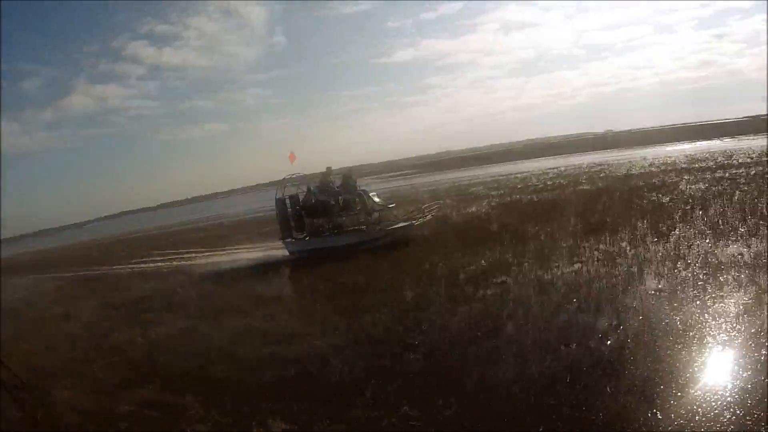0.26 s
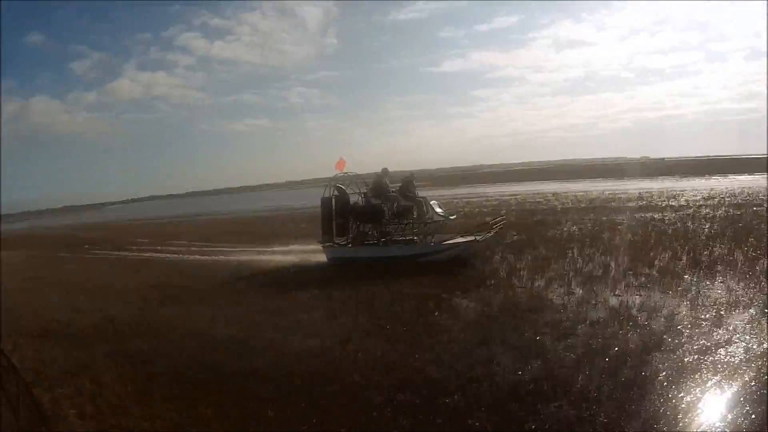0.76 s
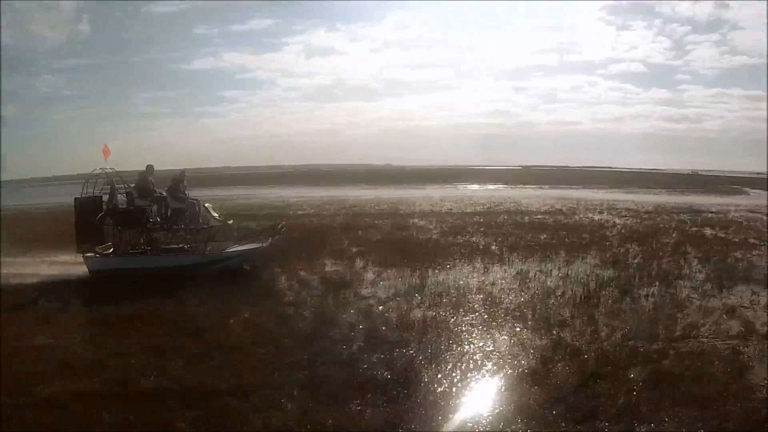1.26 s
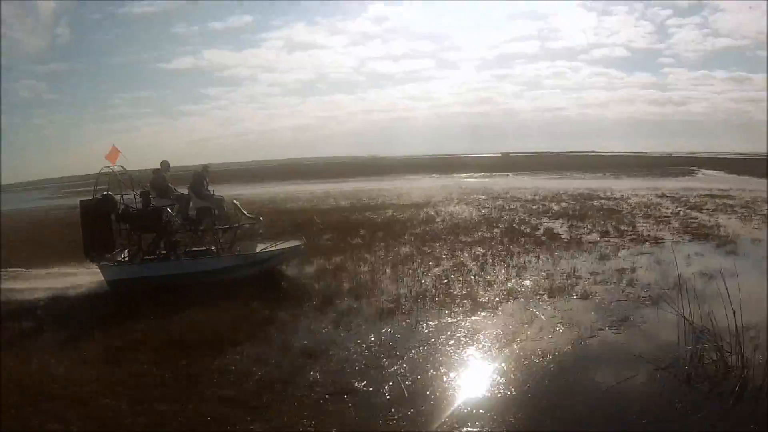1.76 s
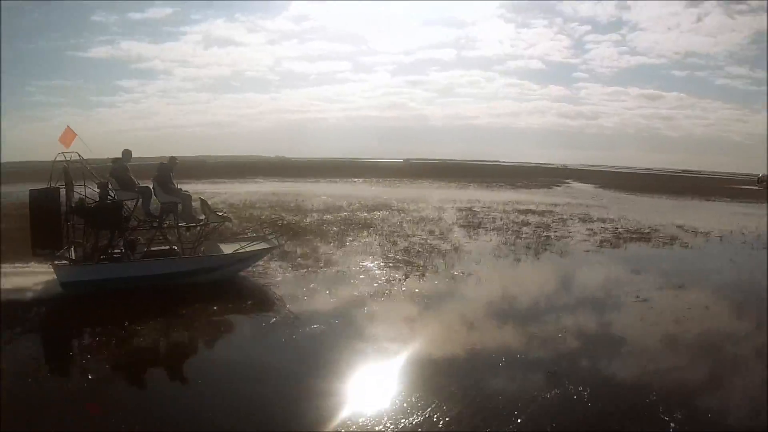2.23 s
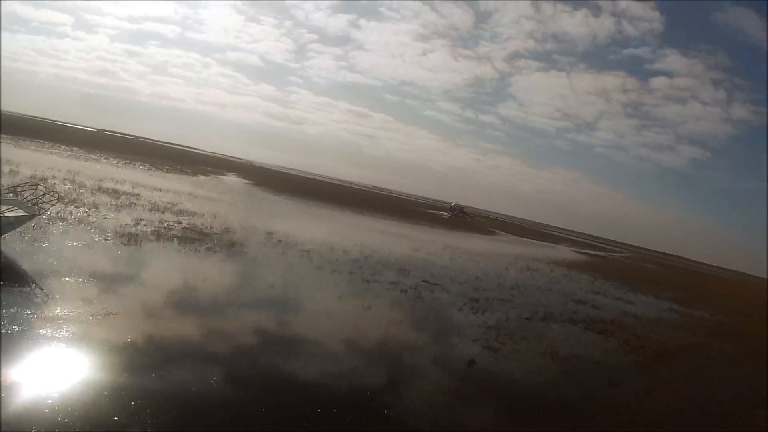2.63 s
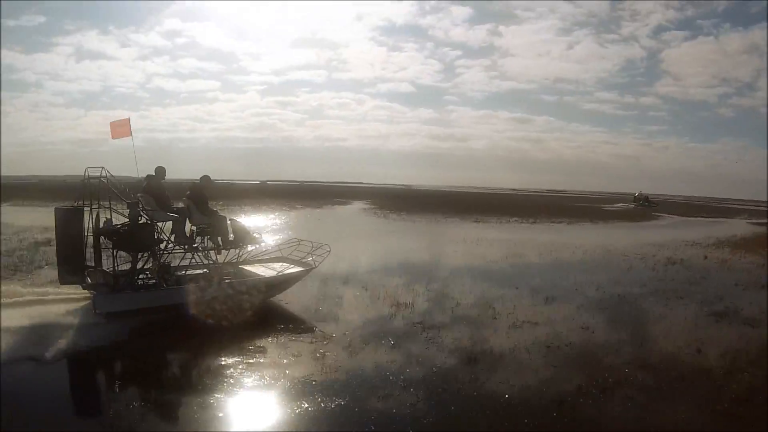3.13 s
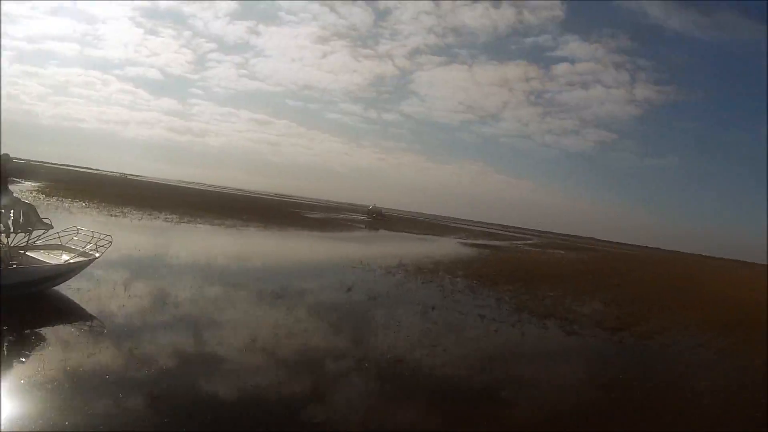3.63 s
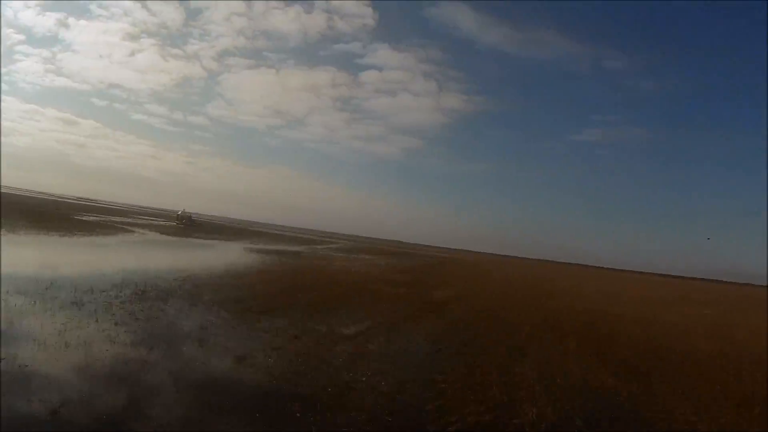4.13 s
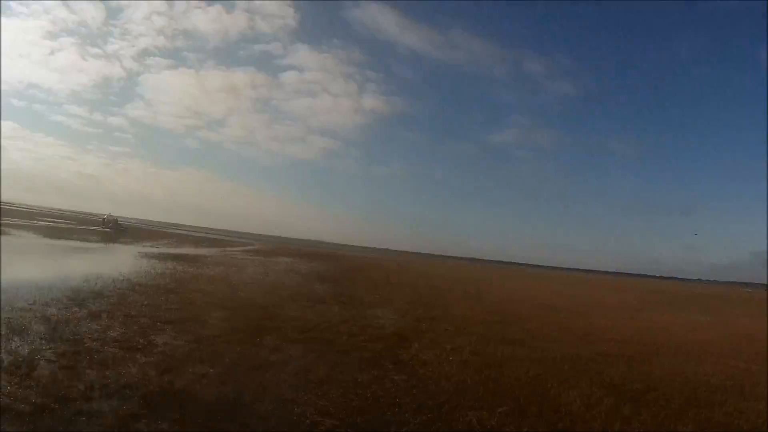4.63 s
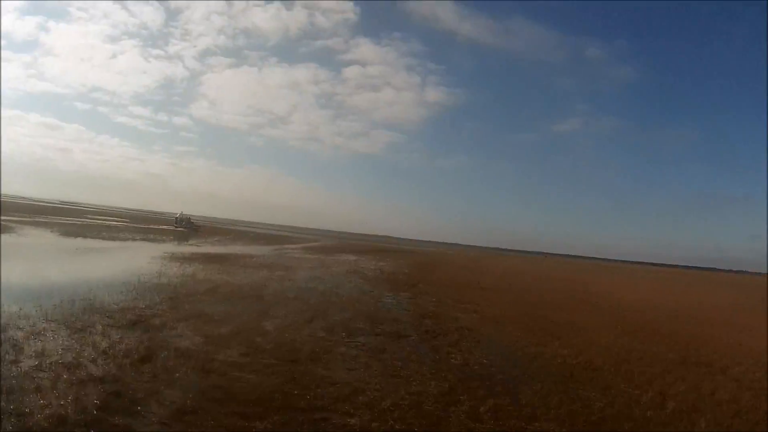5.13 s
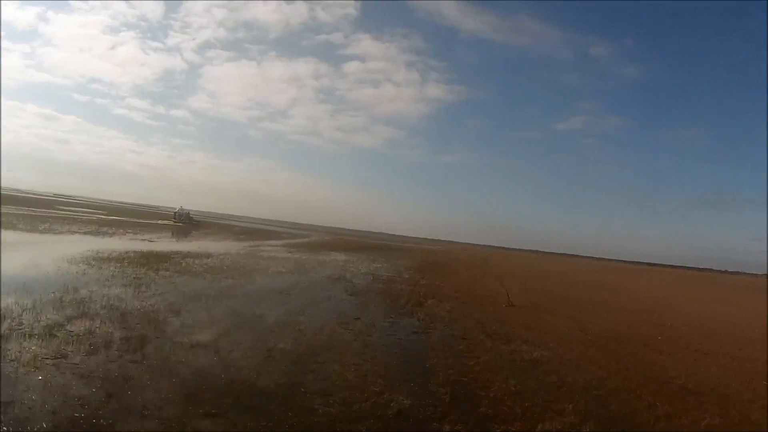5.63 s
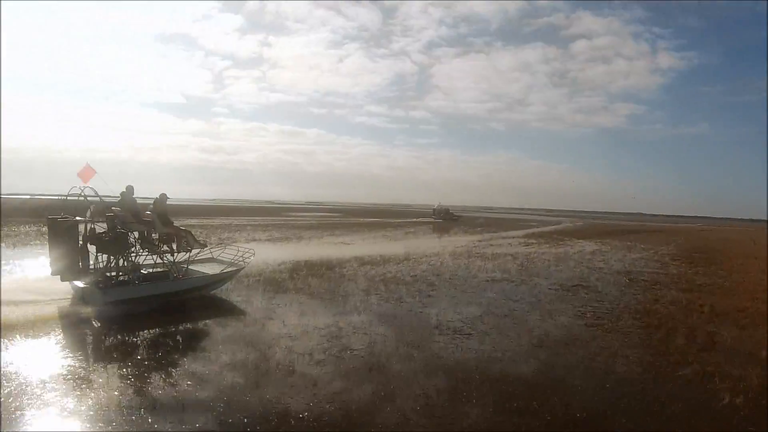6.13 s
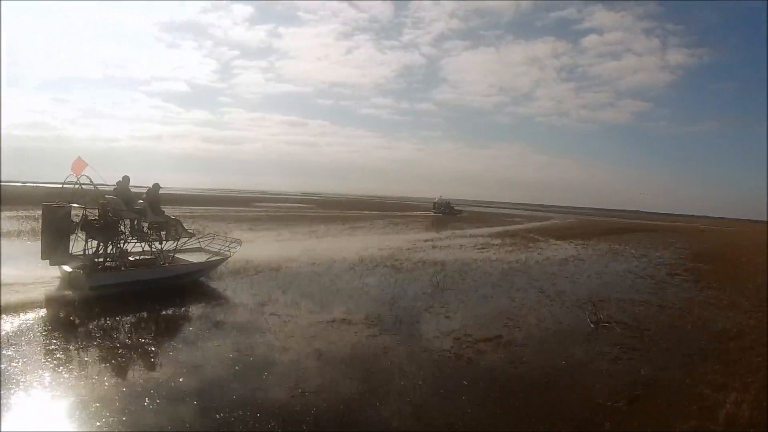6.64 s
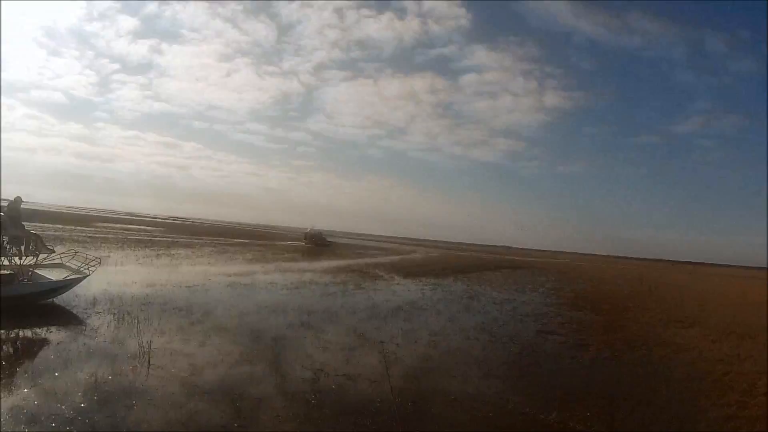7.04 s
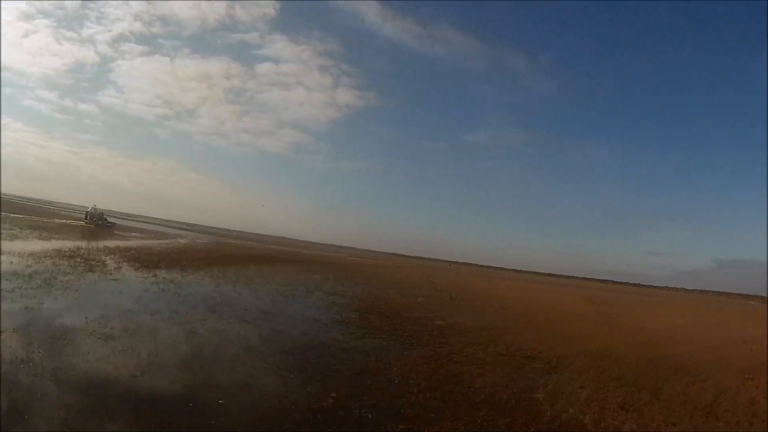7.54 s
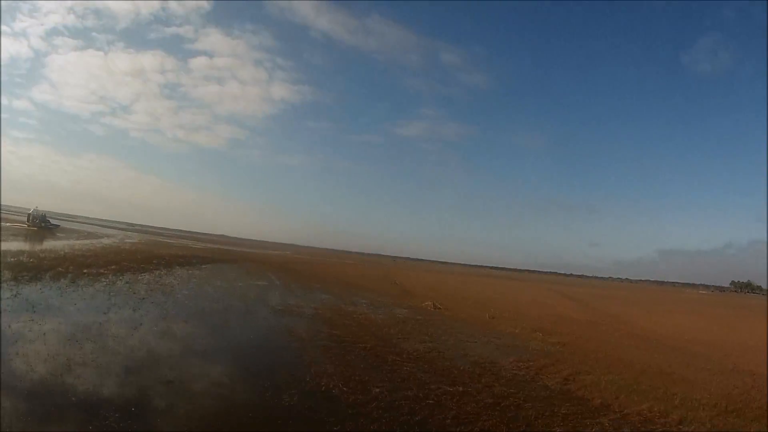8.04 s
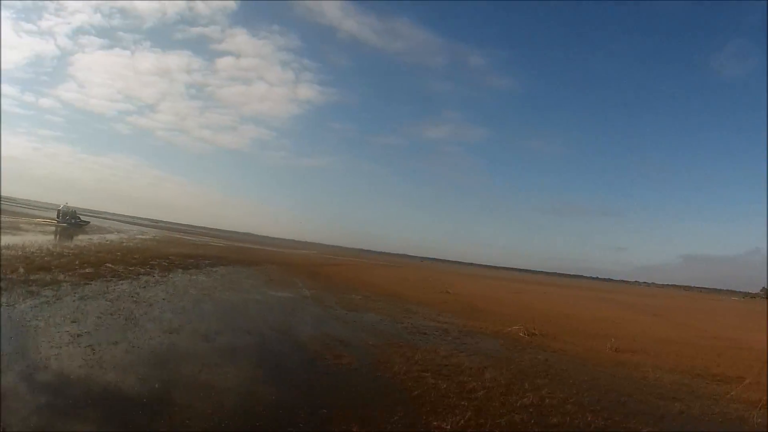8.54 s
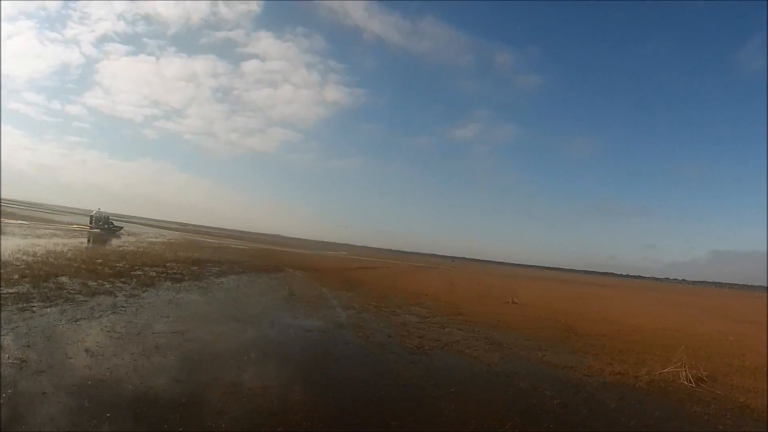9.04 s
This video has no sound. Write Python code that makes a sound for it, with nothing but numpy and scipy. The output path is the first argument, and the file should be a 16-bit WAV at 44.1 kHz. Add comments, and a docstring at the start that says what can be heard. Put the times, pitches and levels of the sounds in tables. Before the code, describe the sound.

Aboard a speeding airboat on open marsh, a geared engine and three-blade propeller drone loudly amid rushing air and hissing spray. A second boat close by guns its throttle, its hard, rapid blade slap dominating until nearly three seconds, then dropping away. The drone gradually lowers, with swells of wash around three and six to seven seconds. Late on, the blades sing with a fluttering high tone. The onboard microphone is windy, close and level-compressed.

```python
"""A driving drone slowly eases off as an airboat, a geared engine with a three-blade propeller, crosses a marsh.
Beside it a second airboat guns its throttle with a hard blade slap; its wash swells when the microphone turns to it.
Tones locked to the firings and blade passes make both voices; the tips whistle and, late on, sing once a turn.
Coloured noise makes the wind, wash and spray; gain control and rounded peaks shape the mix."""
import sys
import numpy as np
from scipy import signal
from scipy.fft import rfft, irfft, next_fast_len
from scipy.io import wavfile

SR = 44100
rng = np.random.default_rng(int(sys.argv[2]) if len(sys.argv) > 2 else 0)


def pcm_store(signal):
    """Save signal as 16-bit PCM."""
    levels = np.round(np.clip(np.atleast_2d(signal), -1, 1) * 32767)
    wavfile.write(sys.argv[1], SR, levels.astype(np.int16).T)


N = 409688

# colours of the air torn by the blades, dull and harsh: [f/Hz, density/dB]
ROAR_COLOUR = [(250, -12.5), (450, 0), (560, -1.5), (750, 0.5), (1020, -0.5), (1200, -19), (1500, -20),
               (3000, -51.5)]
RASP_COLOUR = [(700, -30.5), (1100, 2), (1350, 0), (1550, -3), (1750, -2), (2000, -15.5), (3000, -34),
               (6000, -48)]
# colours of the wash and of the fine spray: [f/Hz, density/dB]
WASH_COLOUR = [(1200, -0.5), (2000, -5.5), (2700, 3), (3300, -0.5), (3900, -8.5), (6000, -18.5),
               (12000, -35.5)]
SPRAY_COLOUR = [(2500, -3), (3700, 0), (4300, 2), (5000, 0.5), (5500, 2.5), (6200, -11.5), (7300, -9),
                (8000, -16), (8700, -14), (9700, -24), (11300, -18.5), (13000, -29), (15000, -32.5)]
# echoes between hull, cage and water favour some pitches and cancel others: [f/Hz, gain/dB]
HULL_ECHO_COLOUR = [(80, 0.5), (110, 2), (143, -9.5), (166, 3.5), (190, 1.5), (218, 5), (255, -5.5),
                    (287, -12.5), (322, 5), (365, 1), (420, 2.5), (460, -1.5), (510, 4), (555, -4),
                    (620, -1.5)]


def from_db(db):
    """Decibels to gain."""
    return np.exp(np.asarray(db) * (np.log(10) / 20))


def rms_one(x):
    """Scale to unit rms."""
    return x / np.sqrt(np.mean(x ** 2) + 1e-20)


def in_time(rows):
    """Each column of a curve, sample by sample."""
    seconds, *columns = np.transpose(rows)
    return [np.interp(np.arange(N) / SR, seconds, column) for column in columns]


def on_log_axis(points, where):
    """Read levels between points on a logarithmic axis of frequency or tone number."""
    x, db = np.transpose(points)
    return np.interp(np.log(where + 1e-9), np.log(x), db)


def drift(rate_hz):
    """Slow random motion with spread 1: noise through two equal low-pass poles."""
    step = 40  # samples between the points of the slow curve
    pole = np.exp(-2 * np.pi * rate_hz * step / SR)
    raw = rng.standard_normal(N // step + 2002)
    slow = signal.lfilter([1], [1, -2 * pole, pole * pole], raw)[2000:]  # skip the settling
    return np.interp(np.arange(N) / step, np.arange(len(slow)), rms_one(slow))


def noise(spectrum):
    """Turbulence with the given colour, falling away above the last point; rms 1."""
    size = next_fast_len(N)
    hz = np.arange(size // 2 + 1) * SR / size
    gain = from_db(on_log_axis(spectrum, hz)) / np.maximum(hz / spectrum[-1][0], 1) ** 2
    white = rfft(rng.standard_normal(size))
    return rms_one(irfft(white * gain, size)[:N])


def colour(x, spectrum):
    """Filter by a spectrum."""
    size = next_fast_len(N + SR // 4)
    hz = np.arange(size // 2 + 1) * SR / size
    return irfft(rfft(x, size) * from_db(on_log_axis(spectrum, hz)), size)[:N]


def throb(cycles, depth):
    """A swell once a cycle; rms 1."""
    return rms_one(np.exp(depth * np.cos(2 * np.pi * cycles)))


def tone(cycles, waver):
    """A sine of about rms 1 whose height and timing waver in the moving air."""
    angle = 2 * np.pi * cycles
    in_step = (1 + waver * drift(3.75)) * np.cos(angle)
    out_of_step = waver * drift(3.6) * np.sin(angle)
    return np.sqrt(2) * (in_step + out_of_step)


def sideways():
    """How far the microphone is turned towards the second boat, 0-1."""
    # sideways glances: [start/s, end/s]
    glances = [(-.5, 2.5), (2.86, 3.87), (5.92, 7.24)]
    turn_s = 0.25
    t = np.arange(N) / SR
    return sum(np.clip(.5 + np.minimum(t - start, end - t) / turn_s, 0, 1) for start, end in glances)


def gusts():
    """Bell-shaped swells in dB, of the roar and of the wash."""
    # gusts swell the rush for a moment: [t/s, width/s, roar swell/dB, wash swell/dB]
    gust_rows = [(.05, 0.89, 2.5, 2.5), (.6, 0.25, 2, 2.5), (1.68, 0.22, 0.5, 2), (1.95, 0.31, 6, 3.5),
                 (3.08, 0.44, 2.5, 4), (3.56, 0.22, 3, 4.5), (4.68, 0.11, 2.8, 1.5), (6.08, 0.17, 5, 5),
                 (6.79, 0.17, 5, 7.2), (7.08, 0.19, 1, 2)]
    t = np.arange(N) / SR
    return sum(np.outer(db, np.exp(-2 * ((t - centre) / width) ** 2)) for centre, width, *db in gust_rows)


def wind():
    """Low turbulence of the wind on the microphone, swelling and sinking."""
    # colour of the buffeting: [f/Hz, density/dB]
    wind_colour = [(10, -27), (25, -17.5), (40, 3), (60, 4.5), (90, -0.5), (200, -30), (600, -53.5)]
    # its level: [t/s, level/dB]
    wind_level = [(0, -29), (1.2, -29), (2.4, -40), (2.75, -33), (4.1, -19.5), (4.55, -31), (5.4, -19),
                  (7.3, -25.5), (7.7, -28.5), (9.29, -31)]
    return from_db(in_time(wind_level)[0]) * noise(wind_colour)


def rush(passes, speed, roar_gust_db, wash_gust_db):
    """Torn air follows engine speed, heading and gusts, with wash, spray and the near exhaust around it."""
    # rushing air: [level at cruise/dB, rise per doubling of speed/dB, rise while turned sideways/dB]
    roar_law = (-25, 2.1, 0.94)
    rasp_law = (-38, 6.1, 7.44)
    wash_law = (-44, .3, 2.2)
    # spray under the hull, before gusts: [t/s, level/dB]
    spray_level = [(0, -44.5), (1.1, -44.5), (2.3, -45), (2.75, -46.5), (4.6, -46.5), (5.3, -49),
                   (7.6, -49), (9.29, -50.5)]
    # the second boat's wash and exhaust from close by: [f/Hz, density/dB]
    near_wash = [(1400, -21.5), (1950, 3.5), (2300, 3), (3000, -8), (5000, -28), (10000, -50.5)]
    near_rumble = [(100, -38), (220, -13), (290, -1.5), (370, -3), (520, -17.5)]

    doublings = np.log2(speed / 110)  # cruise: 110 firings per second
    turned = sideways()

    def follow(law):
        """Level in dB at this speed and heading."""
        cruise_db, doubling_db, turned_db = law
        return cruise_db + doubling_db * doublings + turned_db * turned

    roar_db = follow(roar_law) + roar_gust_db
    rasp_db = follow(rasp_law) + 0.51 * wash_gust_db
    wash_db = follow(wash_law) + wash_gust_db
    spray_db = in_time(spray_level)[0] + 0.4 * wash_gust_db
    blades = from_db(roar_db) * noise(ROAR_COLOUR) * throb(passes, depth=.15)
    blades += from_db(rasp_db) * noise(RASP_COLOUR) * throb(passes, depth=0.075)
    water = from_db(wash_db) * noise(WASH_COLOUR) + from_db(spray_db) * noise(SPRAY_COLOUR)
    # the near wash moves twice as far in dB, so the whole grows fuller as it swells
    water += from_db(2 * wash_db + 34.5) * noise(near_wash)
    exhaust = turned * from_db(wash_db + 12.5) * noise(near_rumble)
    blade_flicker_db = 1.22 * drift(36)
    water_flicker_db = 1.2 * drift(60) + 0.31 * drift(6.6)
    return exhaust + blades * from_db(blade_flicker_db) + water * from_db(water_flicker_db)


def blade_note(passes, hz, doppler, blades_db, sharpness, impure):
    """A note shed by each blade as it swings by, falling in pitch as the blade turns away."""
    swing = passes % 1 - .5
    blade = np.floor(passes).astype(int) % len(blades_db)
    heard = from_db(blades_db)[blade] * np.cos(np.pi * swing) ** (2 * sharpness)
    cycles = np.cumsum(hz * (1 - doppler * swing)) / SR + impure * drift(400)
    return rms_one(heard * np.sin(2 * np.pi * cycles))


def tip_whistle(passes):
    """Air shed by the fast blade tips whistles high up, with a pitch fall on every pass."""
    # loudness of the whistle: [t/s, level/dB]
    whistle_level = [(0, -59), (.6, -56), (1.5, -60), (2.3, -62), (2.7, -76), (3, -63), (4.3, -69.5),
                     (6.3, -76), (7.9, -70), (9.29, -75)]
    # strength of each of the three blades: [level/dB]
    whistle_blades_db = [0, 0.5, -5.5]
    note = blade_note(passes, hz=11600, doppler=.2, blades_db=whistle_blades_db, sharpness=0.65, impure=0.59)
    return from_db(in_time(whistle_level)[0] + 1.5 * drift(60)) * note


def singing(passes, doppler, sharpness):
    """Vortices leave the blades in step with the turning; each blade's note swells and falls once a turn."""
    # blade singing at low speed: [t/s, level/dB]
    singing_level = [(0, -66), (7.4, -40), (7.9, -34), (8.4, -25), (9.29, -25.5)]
    # strength of each of the three blades: [level/dB]
    singing_blades_db = [8.5, -10, -8]
    notes = 0
    for k, db in enumerate(singing_blades_db):
        turn = (passes + k) / len(singing_blades_db)
        cycles = 44 * turn  # vortices per turn
        glide = doppler * np.cos(2 * np.pi * turn) + .04 * drift(30)
        notes = notes + from_db(db) * throb(turn, sharpness) * tone(cycles + glide, waver=0.11)
    return from_db(in_time(singing_level)[0]) * rms_one(notes)


def off_the_water(x):
    """Add the bounce off the water; its moving delay sweeps a notch down through the tones."""
    # the bounce comes later as the boat draws near: [t/s, delay/ms]
    water_echo = [(1, 1.4), (1.5, 1.25), (1.72, 1.68), (2, 2.46), (2.35, 4.33)]
    at, echo = np.arange(N), from_db(-5.5)
    lag = in_time(water_echo)[0] * SR / 1000  # samples
    return (x + echo * np.interp(at - lag, at, x)) / np.sqrt(1 + echo ** 2)


def other_boat(roar_gust_db, wash_gust_db, lean):
    """A short rise and a sharp dip per blade, then torn air; faster tips slap brighter and throw up spray."""
    # one hard burst of throttle: [t/s, blade passes per second/Hz]
    other_speed = [(0, 55.8), (.6, 56.5), (1, 62.4), (1.22, 59.7), (1.55, 72.3), (1.85, 77.1), (2.47, 80.5),
                   (2.8, 56.3), (2.97, 49.8), (3.3, 48.7)]
    # blade slap, loudest in the plane of the propeller: [t/s, level/dB]
    slap_level = [(0, -59), (.7, -30), (1, -34), (1.27, -27.5), (1.5, -20.5), (1.8, -20), (2.38, -20.5),
                  (2.58, -25.5), (2.78, -25), (3, -41), (9.29, -59)]
    # tones of the slap: [multiple of the blade rate, level/dB]
    slap_tones = [(1, 1.5), (2, 5.5), (3, 4), (4, -2), (5, 4), (6, -16.5), (7, -30), (9, -8.5), (10, -16.5),
                  (12, -8), (14, -7.5), (16, -15.5), (19, -18), (23, -29.5), (27, -36.5), (34, -28.5),
                  (50, -48.5)]

    rate, = in_time(other_speed)
    passes = np.cumsum(rate) / SR
    speed_db = 15 * np.log(rate / 78)  # below 0 when the tips are slow and dull
    # some blades bite harder than others, which shows most in the high tones
    bite_db = 1.0 * drift(37)
    slaps = 0
    for k in np.arange(1, 46):
        brightness_db = (speed_db + bite_db) * np.log(np.clip(k / 1.7, 1, 6))
        gain = from_db(on_log_axis(slap_tones, k) + brightness_db)
        slaps = slaps + gain * np.cos(2 * np.pi * k * passes - lean)
    slaps = off_the_water(-np.sqrt(2) * slaps)

    torn = from_db(roar_gust_db - 5.0) * noise(ROAR_COLOUR) + from_db(-17.5) * noise(SPRAY_COLOUR)
    harsh = from_db(-4.5) * noise(RASP_COLOUR) + from_db(-18.0) * noise(WASH_COLOUR)
    torn += from_db(wash_gust_db) * harsh
    # the torn air bursts out just after each slap
    burst = throb(passes - .05, depth=1.05) * from_db(1.6 * speed_db + bite_db)
    thrown = from_db(-19.0 + 7.5 * speed_db) * noise(SPRAY_COLOUR)
    return from_db(in_time(slap_level)[0]) * (slaps + torn * burst + thrown)


def chops(passes, level_db, spread_db, width_hz):
    """Blades cut gusts and thump: one dull dip per pass, each of its own random depth, so that some stand out."""
    at = np.flatnonzero(np.diff(np.floor(passes)))
    clicks = np.zeros(N)
    clicks[at] = from_db(spread_db * np.minimum(rng.standard_normal(len(at)), 2))
    soften = signal.bessel(5, width_hz, fs=SR, output="sos")
    dips = signal.sosfilt(soften, clicks + 1e-18)
    thin = signal.butter(1, 70, "high", fs=SR, output="sos")
    return -from_db(level_db) * rms_one(signal.sosfilt(thin, dips))


def propeller(passes, blade_db):
    """Each blade leaves a pressure pulse, smeared by the cage; turbulent inflow shakes the high tones most."""
    # tones of the pulse: [multiple of the blade rate, level/dB]
    blade_tones = [(1, -2.5), (2, -1.5), (3, 1), (4, -4), (5, -9), (6, -8), (7, -13.5), (8, -13),
                   (10, -14.5), (11, -21.5), (13, -17.5), (15, -19.5), (16, -19), (18, -24), (22, -40.5)]
    dips = 0
    for k in np.arange(1, 23):
        # higher tones arrive later, so the pulse is spread over the pass
        cycles = k * passes - .025 * k * k
        dips = dips + from_db(on_log_axis(blade_tones, k)) * tone(cycles, waver=0.034 + 0.056 * k)
    return colour(-from_db(blade_db) * dips, HULL_ECHO_COLOUR)


def engine(firings, firing_db, crank_db, bank_db, orders_db, rumble_db):
    """The firing tone, lower and higher orders from the uneven banks, and rumble puffed out by each firing."""
    # further engine orders: [multiple of the firing rate, level/dB]
    engine_orders = [(1.5, -34.5), (2, -32), (3, -40), (3.5, -44), (4.5, -38)]
    # colour of the exhaust rumble: [f/Hz, density/dB]
    rumble_colour = [(40, -28), (75, -13), (110, 3), (165, 2), (240, -1.5), (320, -6), (420, -11),
                     (600, -20), (1200, -38)]
    out = from_db(firing_db) * tone(firings, waver=0.12)
    out += from_db(crank_db) * tone(firings / 2, waver=0.13)
    out += from_db(bank_db) * tone(firings * 2.5, waver=0.22)
    orders = sum(from_db(db) * tone(firings * multiple + rng.random(), waver=0.47)
                 for multiple, db in engine_orders)
    out += from_db(orders_db) * colour(orders, HULL_ECHO_COLOUR)
    return out + from_db(rumble_db) * noise(rumble_colour) * throb(firings, depth=0.57)


def at_speed(speed):
    """Each level of the boat's voice at the given speed."""
    # voice against speed: [firings per second/Hz, firing tone/dB, crank tone/dB, uneven-bank tone/dB,
    # lift of the further orders/dB, rumble/dB, blade tones/dB]
    voice = [(84.3, -17.5, -41, -29, 1.5, -21.5, -36), (98.5, -19, -38.5, -34, 1.5, -18, -30.5),
             (120, -22.5, -32, -36.5, -4, -19.5, -24), (124, -22.5, -26.5, -28.5, 3, -22, -25),
             (133.8, -24, -20.5, -33.5, 1.5, -21.5, -22)]
    rate, *columns = np.transpose(voice)
    return [np.interp(speed, rate, db) for db in columns]


def scene():
    """Both boats and the wind, in one channel."""
    # own engine, two pushes of the throttle and a long easing off: [t/s, firings per second/Hz]
    own_speed = [(0, 119.2), (.4, 130), (.72, 133), (1.1, 129), (1.5, 122.9), (1.85, 120.3), (2.3, 123.9),
                 (2.57, 132.2), (2.95, 133.9), (3.6, 120.2), (4.3, 112.4), (5.45, 110.1), (6.2, 100.4),
                 (7.42, 96.3), (7.9, 87.7), (8.4, 83.6), (8.9, 82.8), (9.29, 83.7)]
    speed, = in_time(own_speed)
    firings = np.cumsum(speed) / SR
    passes = firings * 9 / 14  # blade passes per firing, set by the gearing
    *exhaust_db, blade_db = at_speed(speed)
    roar_gust_db, wash_gust_db = gusts()

    air = wind() + rush(passes, speed, roar_gust_db, wash_gust_db)
    notes = tip_whistle(passes) + singing(passes, doppler=0.42, sharpness=0.91)
    other = other_boat(roar_gust_db, wash_gust_db, lean=0.78)
    own = chops(passes, level_db=-31.5, spread_db=13.0, width_hz=544)
    own += propeller(passes, blade_db) + engine(firings, *exhaust_db)
    return (air + notes + other + own)[None]


def gain_control(x, target_db, strength, follow_hz):
    """The gain falls as the sound swells and recovers as it sinks."""
    pole = np.exp(-2 * np.pi * follow_hz / SR)
    power = x ** 2 / from_db(target_db) ** 2
    # smoothed power, starting on target
    excess = 1 + signal.lfilter([1 - pole], [1, -pole], power - 1)
    return x * from_db(-strength * 10 * np.log10(excess + 1e-9))


def record(dry):
    """Hold the level steady, so the loud slap pushes all else down; then round the peaks and cut the top."""
    held = gain_control(dry, target_db=-15.0, strength=0.85, follow_hz=3.2)
    rounded = held / (1 + held ** 6) ** (1 / 6)
    top_cut = signal.ellip(10, .1, 80, 15300, fs=SR, output="sos")
    return signal.sosfilt(top_cut, rounded)


dry = scene()
out = record(dry)
pcm_store(out)
```